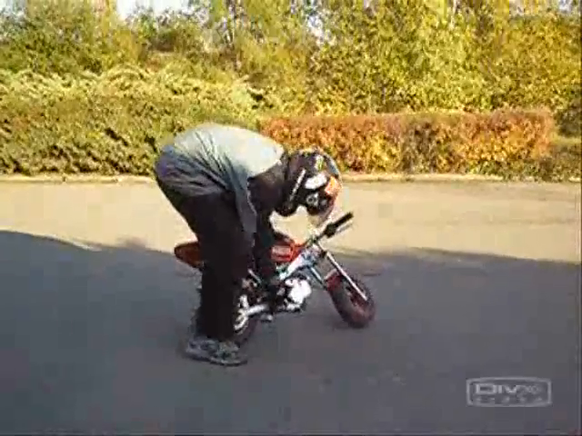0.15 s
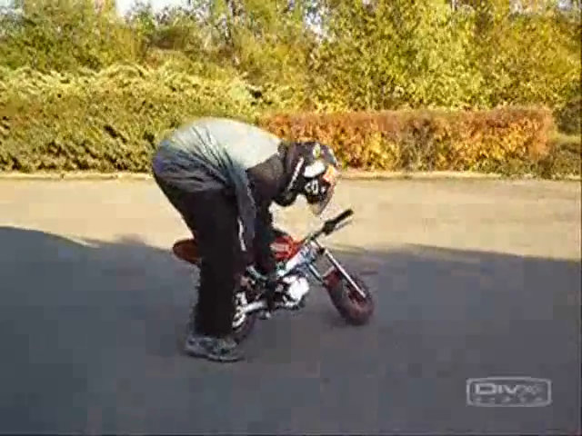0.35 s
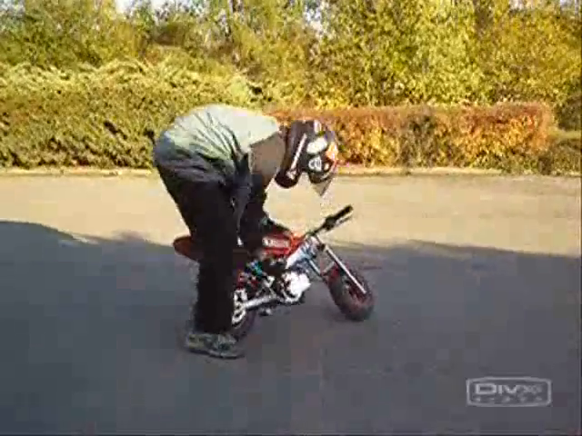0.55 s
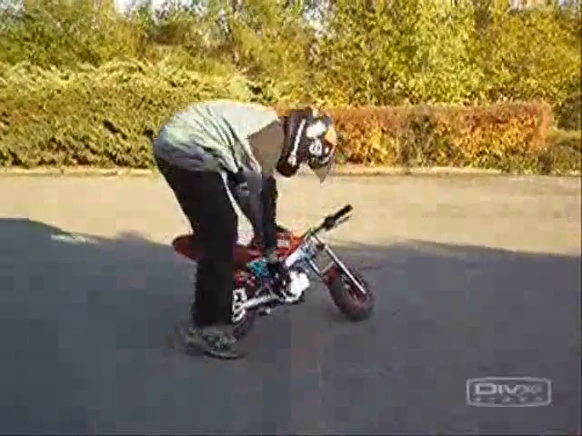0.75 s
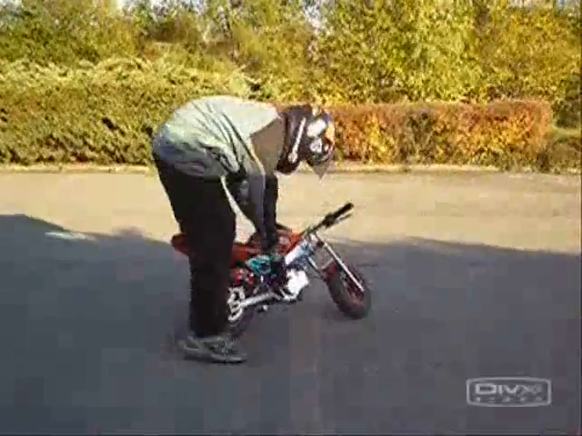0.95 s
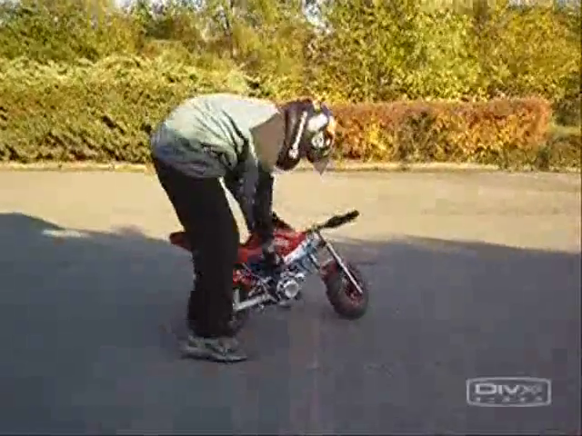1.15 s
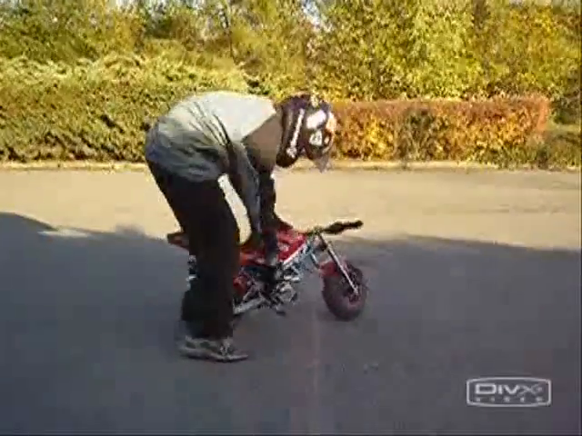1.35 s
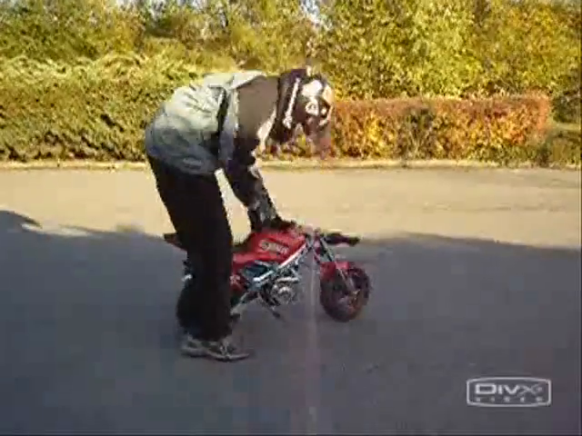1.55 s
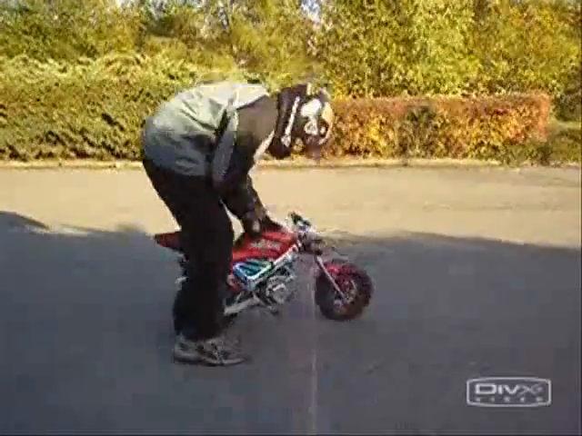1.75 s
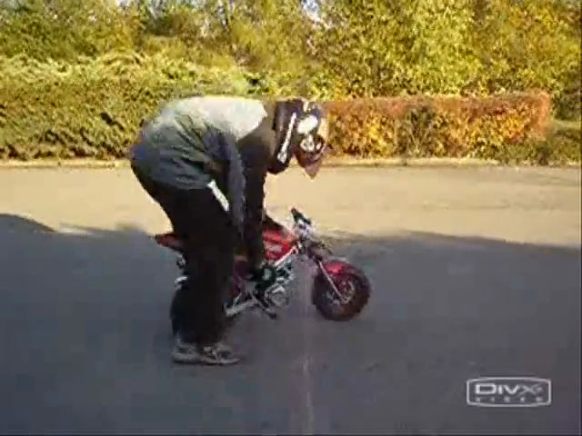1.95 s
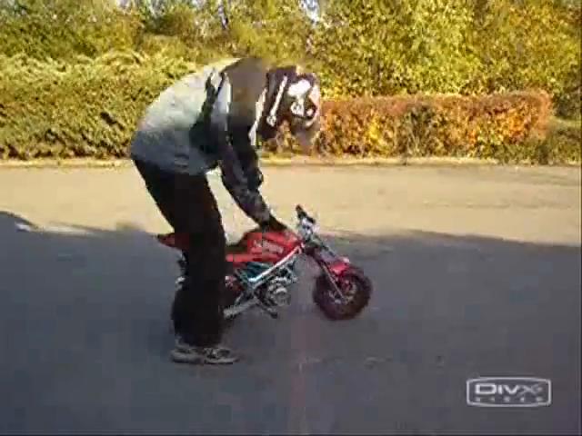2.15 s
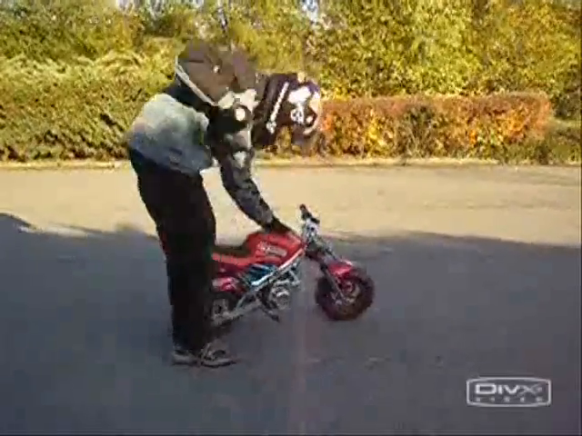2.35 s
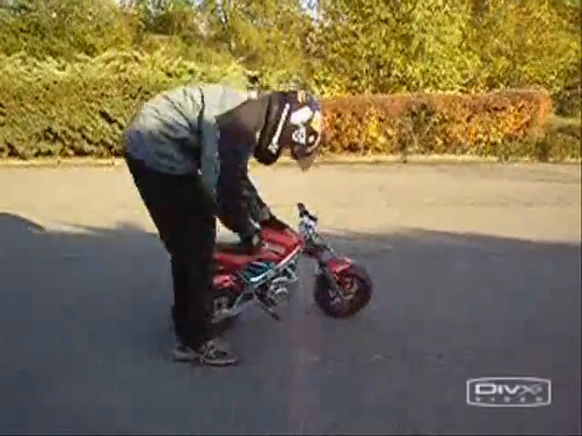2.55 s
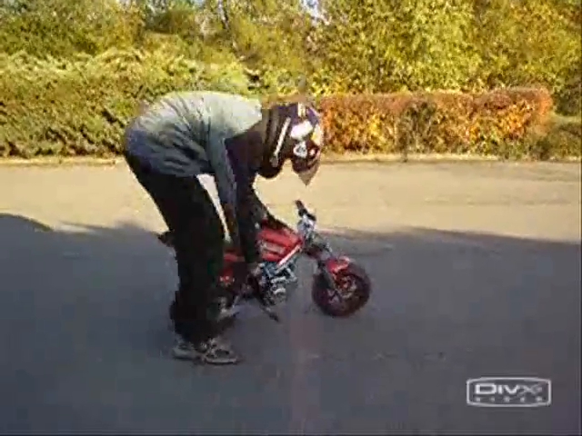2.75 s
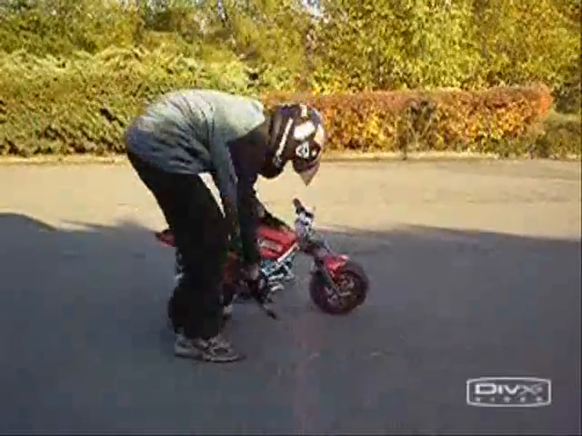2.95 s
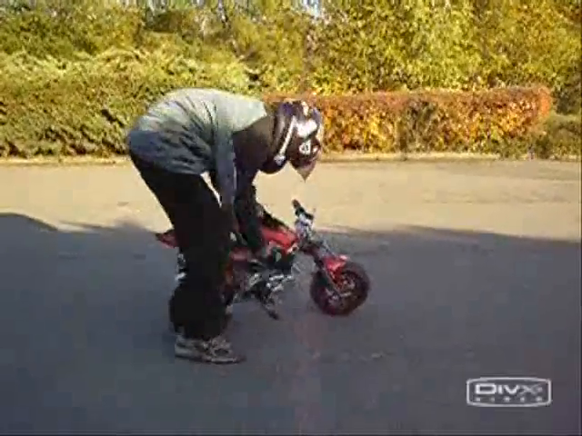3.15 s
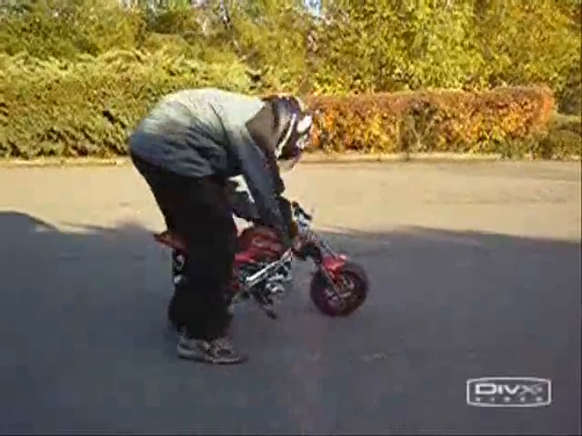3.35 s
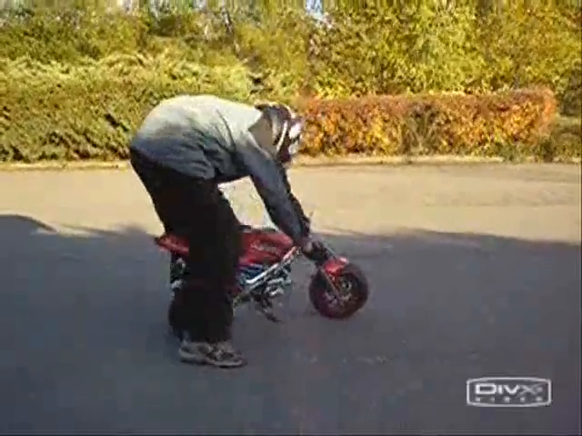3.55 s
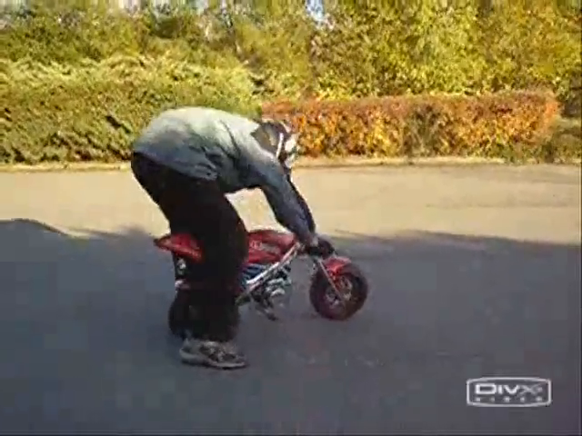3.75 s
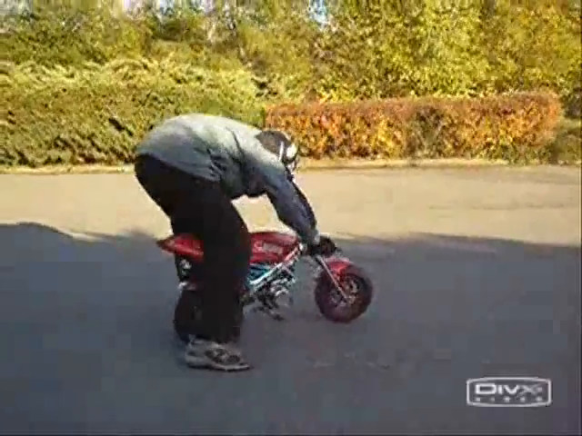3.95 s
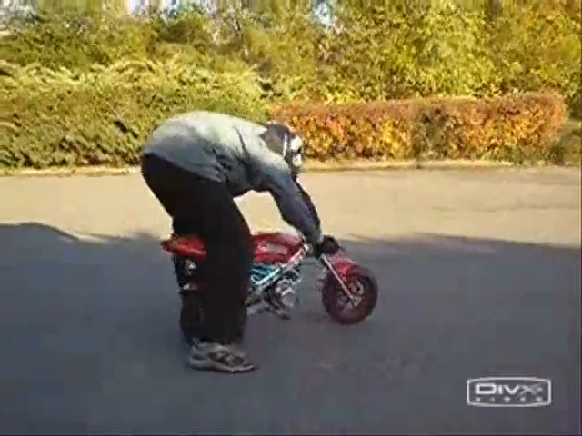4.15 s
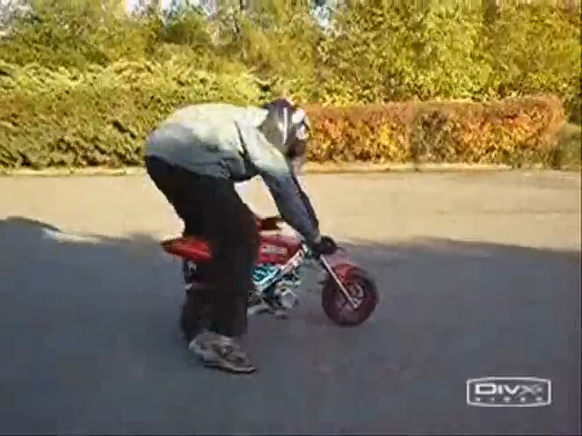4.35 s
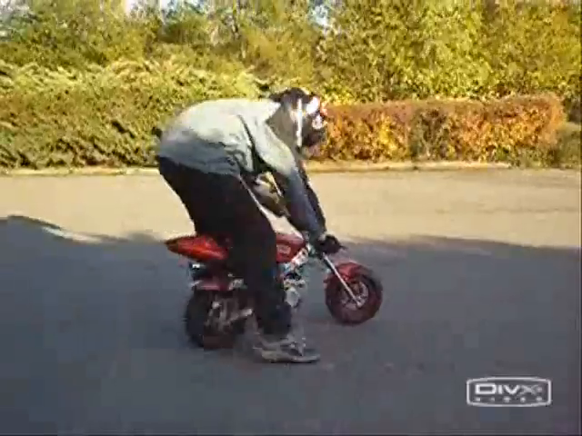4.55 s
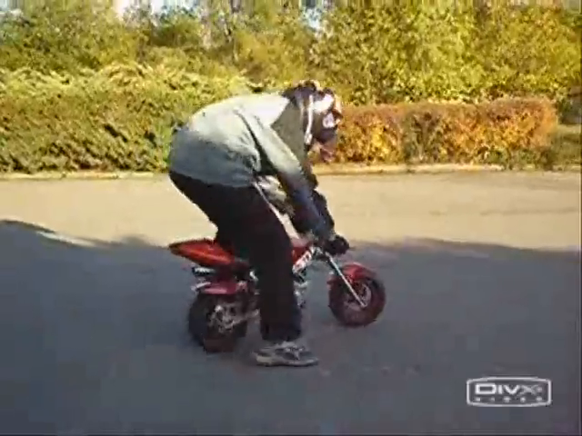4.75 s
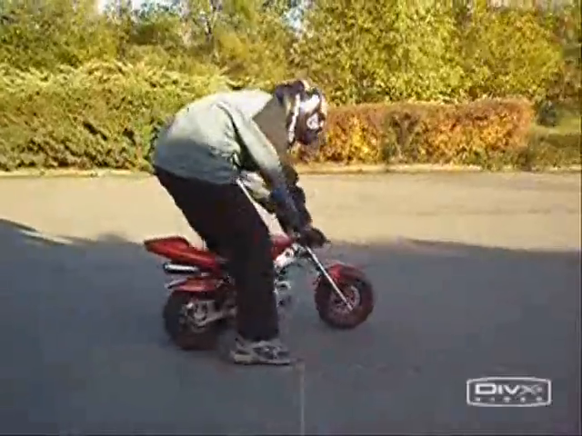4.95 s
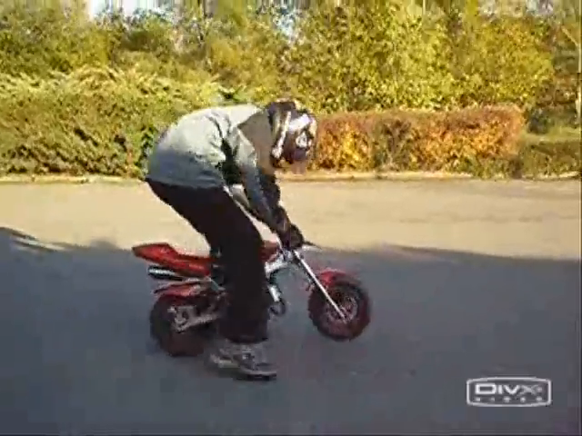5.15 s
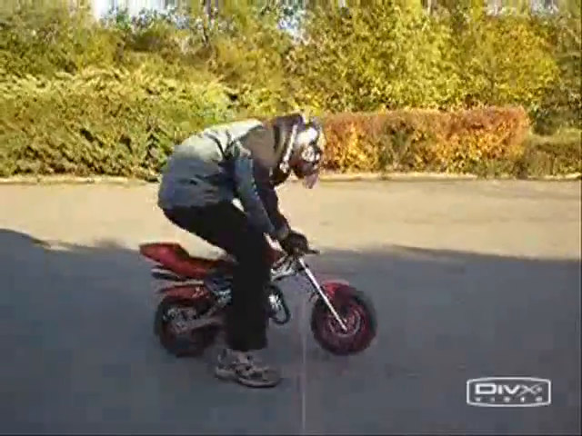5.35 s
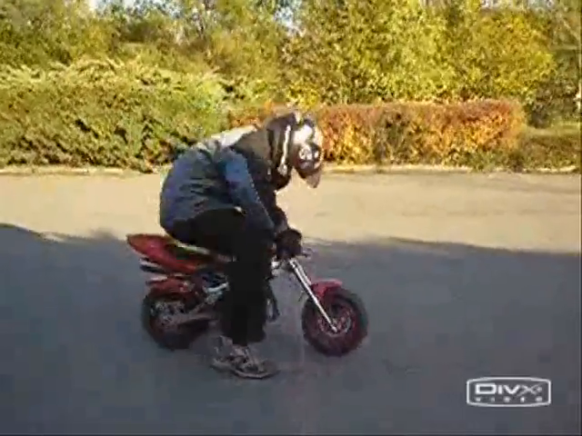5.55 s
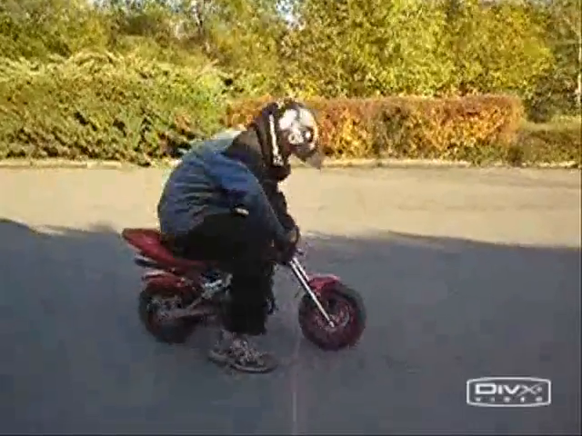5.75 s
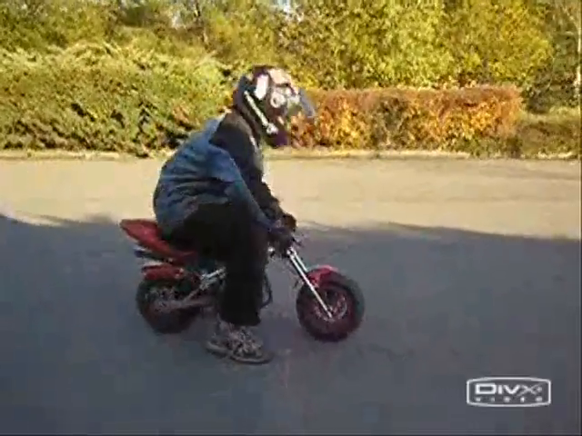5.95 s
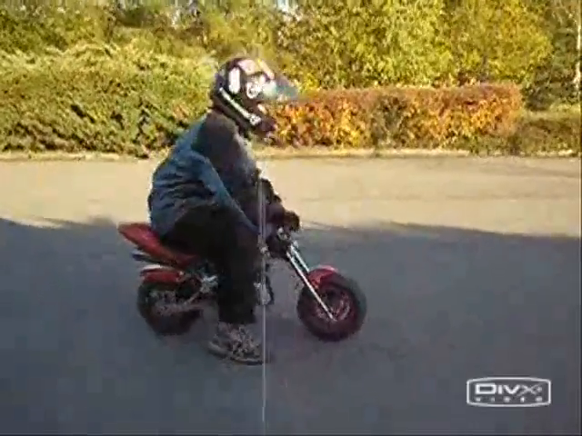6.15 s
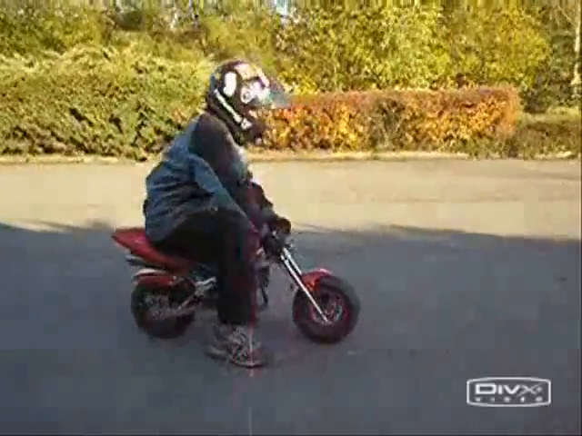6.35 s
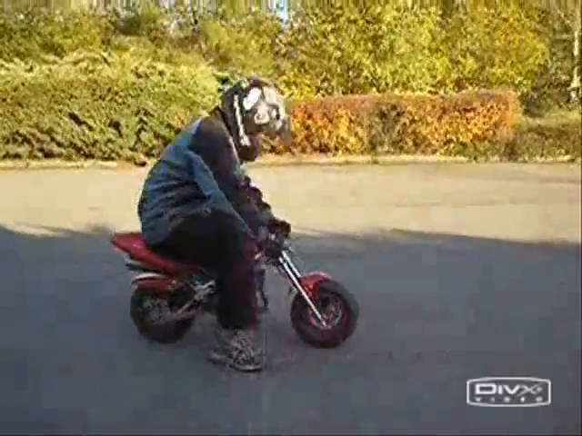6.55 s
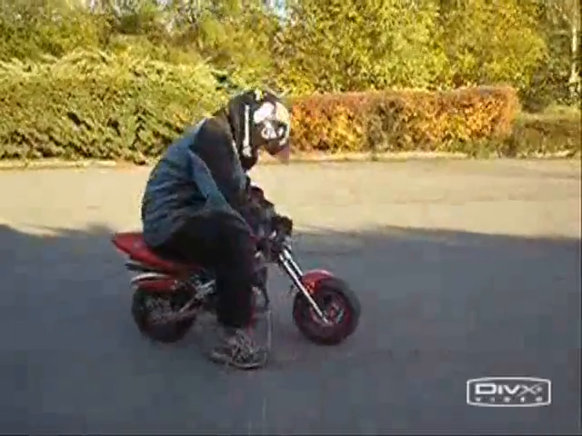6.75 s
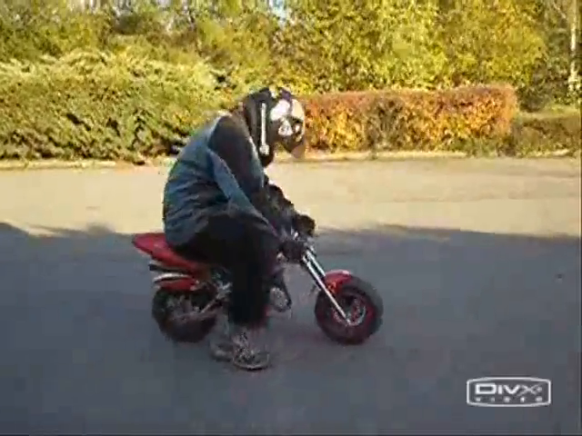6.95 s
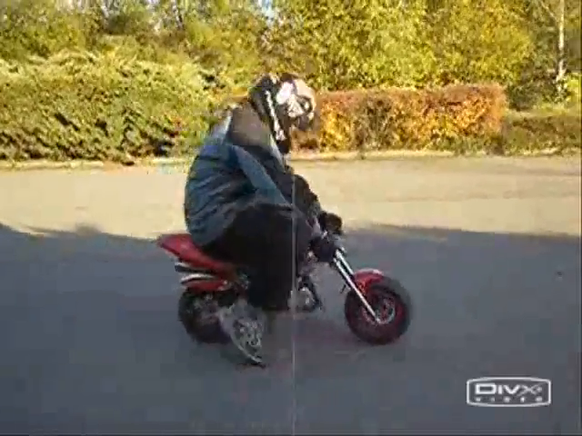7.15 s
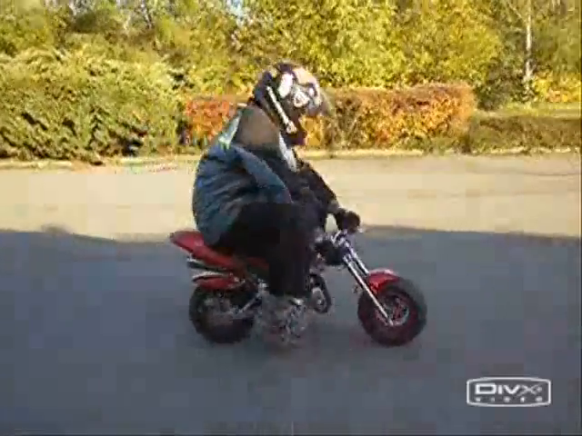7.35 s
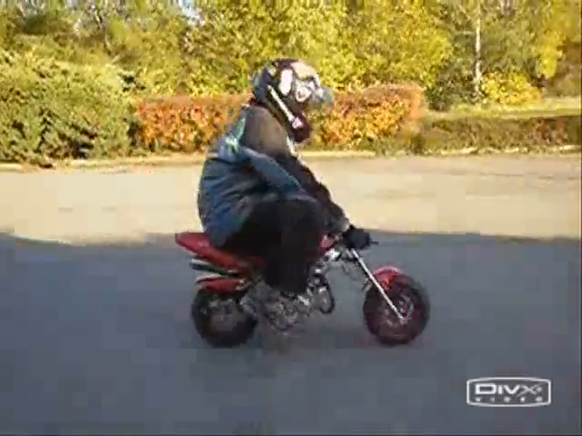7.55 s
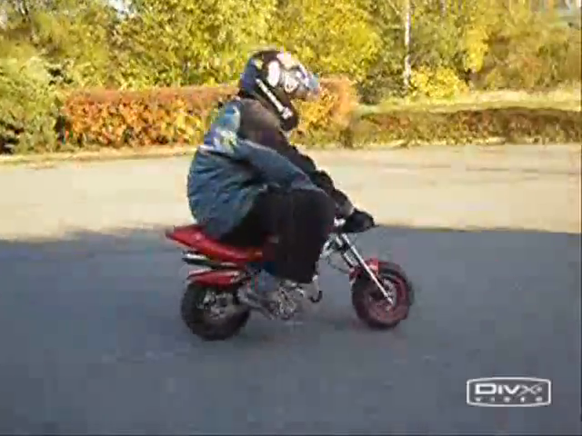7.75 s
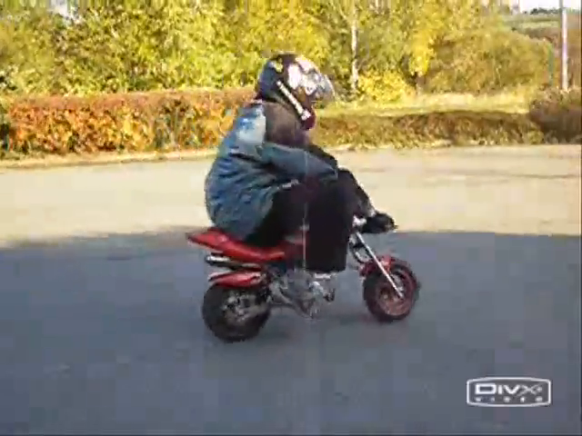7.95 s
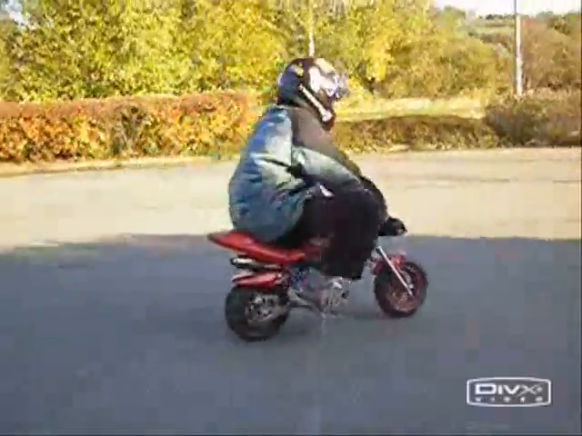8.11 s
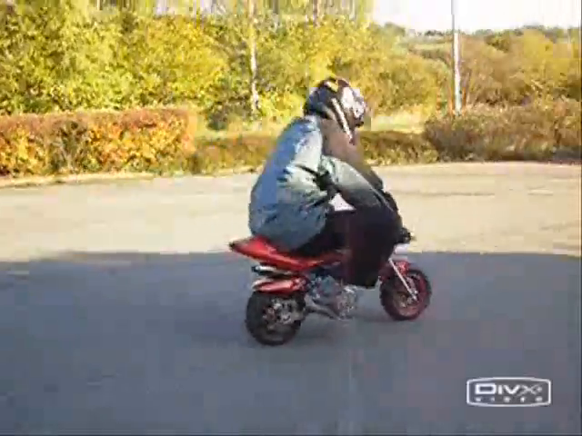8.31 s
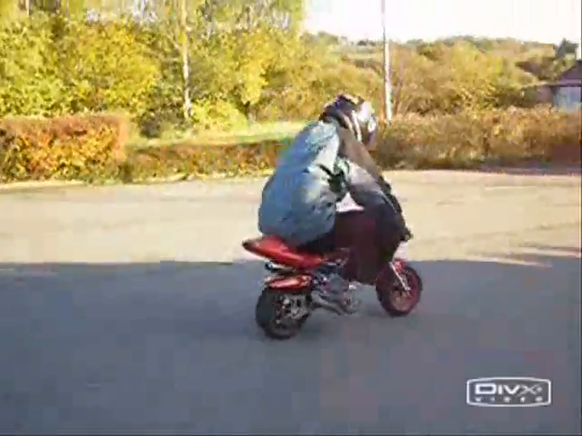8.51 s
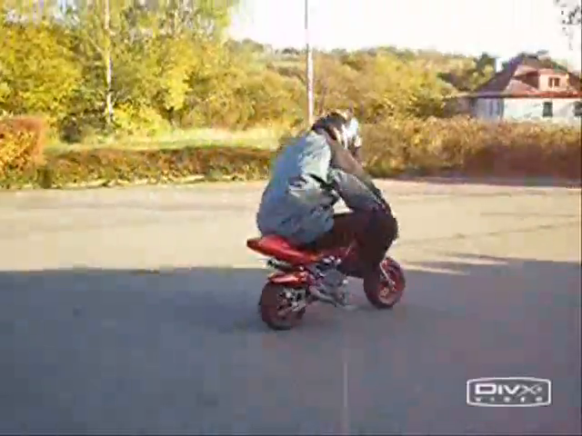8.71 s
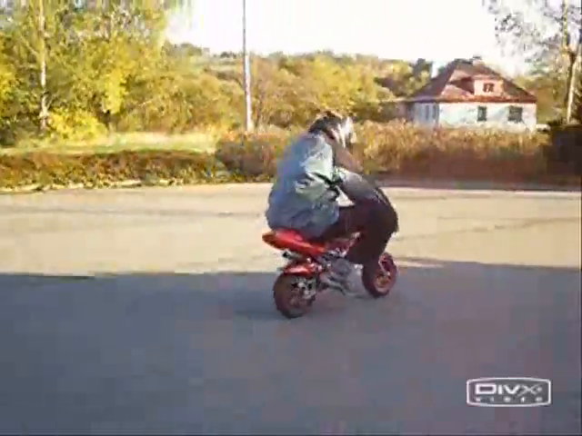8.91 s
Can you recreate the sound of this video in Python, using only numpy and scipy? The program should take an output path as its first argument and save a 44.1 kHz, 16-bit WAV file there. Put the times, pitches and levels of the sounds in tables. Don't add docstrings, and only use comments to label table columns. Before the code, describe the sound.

A mini motorbike is fiddled with and yanked to life outdoors, sputtering with ringing metal before smoothing into a high, even drone moving away.

```python
import sys
import numpy as np
from scipy import signal
from scipy.fft import rfft, irfft, next_fast_len
from scipy.io import wavfile
from scipy.ndimage import uniform_filter1d, map_coordinates

SR = 44100
rng = np.random.default_rng(int(sys.argv[2]) if len(sys.argv) > 2 else 0)


def int16_out(signal):
    q = np.round(np.clip(np.atleast_2d(signal).T, -1, 1) * 32767)
    wavfile.write(sys.argv[1], SR, q.astype(np.int16))


def volts_from_decibels(level):
    exponent = np.asarray(level, float) / 20
    return 10 ** exponent


N = 396018

# pitch_hz, level_db (per Hz)
AIR_SPECTRUM = [(18, -50), (30, -10.5), (128, -6), (165, 3.5), (295, 0.5), (335, -3.5), (365, 2),
                (677, 0.5), (3020, -12.5), (4930, -26.5), (6410, -70.5), (10800, -120)]
# time_s, level_db
AIR_LEVEL = [
    (0.0, -40.5),
    (0.628, -39.5),
    (1.6, -36.5),
]
# delay_s, level_db
ECHOES = [
    (.009, -16),
    (.021, -20),
]
# start_s, peak_db, low_ring_hz, high_ring_hz, high_share_db
CONTACTS = [(0.71, -31.5, 990, 2130, -0.5), (0.806, -10.5, 880, 2200, -13.5), (0.95, -17, 550, 2410, -13.5),
            (1.013, -13, 790, 2560, -14.5), (1.128, -14, 472, 1730, -21.5), (1.163, -6, 520, 1760, -20),
            (1.205, -20, 470, 2080, -1.5), (1.268, -15, 593, 2290, -6.5), (1.297, -19, 824, 2200, 0),
            (1.347, -11, 507, 2230, -12), (1.403, -25, 547, 2680, -4), (1.493, -23.5, 530, 2680, -3),
            (1.518, -11.5, 875, 2270, -6), (1.653, 3, 810, 2170, -6.5), (1.71, -8, 860, 2590, -5.5),
            (1.759, -2.5, 630, 1780, -19.5), (1.824, -1, 635, 2080, -21.5), (1.929, 2.5, 657, 2500, -17.5),
            (2.049, -9.5, 676, 1730, 4.5), (2.257, -28.5, 487, 2460, 4.5), (2.295, 3, 713, 1800, -6),
            (2.433, -14, 530, 2420, -3.5), (2.468, -3, 840, 2510, -4), (2.492, -5, 747, 2234, -3)]
# pitch_hz, level_db, t60_s
PAWL = [(3430, -8, .09), (4520, -10, .08)]
# start_s, peak_db, pitch_hz
COUGHS = [
    (1.723, -6, 176),
    (2.339, -1.5, 198),
    (2.355, -2, 195),
    (2.385, -2.5, 234),
    (2.444, -0.5, 191.3),
]
# start_s, length_s, pitch_hz, level_db
SPRING = (2.175, .065, 576, -27)
# time_s, effort_db
PULLS = [
    [(1.625, -35.5), (1.665, -26), (1.7, -33), (1.84, -28), (1.87, -18), (1.915, -24.5), (1.935, -12.5), (2.064, -21), (2.15, -39.5)],
    [(2.3, -23), (2.43, -24), (2.474, -18), (2.5, -18.5), (2.55, -19), (2.58, -31)],
]
# pitch_hz, level_db (per Hz)
DRUM_SPECTRUM = [(120, -40.5), (200, -5.5), (361, -10), (477, -1), (555, -2.5), (646, -5.5), (1320, -9),
                 (1500, -56.5), (1950, -45), (3300, -120)]
# pitch_hz, level_db (per Hz)
RATCHET_SPECTRUM = [(880, -24), (1500, -8), (1670, -5), (1890, -5.5), (2310, 0.5), (2670, -0.5),
                    (3500, -10), (4930, -24), (6410, -59), (10800, -120)]
# pitch_hz, level_db, shift_at_bite_hz
GEAR_WHINES = [(3610, -38, -40), (4160, -43.5, 109)]
# start_s, level_db
SWELLS = [(2.557, -17), (2.712, -15.5), (2.841, -11.5), (2.978, -12), (3.153, -13), (3.309, -11.5),
          (3.544, -11.5), (3.661, -9), (3.788, -16), (3.895, -9), (4.099, -12), (4.168, -9), (4.259, -11.5),
          (4.33, -9), (4.417, -11.5), (4.563, -9), (4.649, -10.5), (4.733, -10), (4.859, -11.5),
          (5.046, -10.5), (5.147, -14), (5.295, -18), (5.547, -18), (5.719, -12.5), (5.92, -16.5),
          (6.096, -12), (6.253, -18), (6.407, -14), (6.613, -14.5), (6.765, -16.5)]
# time_s, pitch_hz, second_mode_db
BELL_TUNING = [(2.55, 1220, -47.5), (2.92, 1218, -22), (4.13, 1212, -18), (4.56, 1228, -23.5),
               (4.75, 1244, -9.5), (4.95, 1217, -16), (5.33, 1220, -34), (5.7, 1216, -39.5),
               (6.15, 1250, -16), (6.82, 1241, -20)]
# time_s, turns_hz, effort_db
CRANK = [(2.5, 49, -25), (2.61, 54.12, -16.5), (2.97, 61.35, -9), (3.09, 71.5, -11), (3.58, 73.2, -12),
         (3.69, 79.7, -11.5), (4.05, 78.7, -15.5), (4.34, 81.2, -13), (4.77, 82.66, -12), (5.1, 78.08, -13),
         (5.66, 77.06, -12), (6.2, 84.34, -11), (6.67, 82.6, -10.5), (6.81, 91.3, -9), (6.87, 95.5, -17),
         (7.06, 98.74, -13.5), (7.8, 99, -14), (8.98, 99.4, -17)]
# time_s, clutch_grip (0-1), firing_unevenness (0 even, 1 rough)
LOAD = [
    (2.5, 0, 1.5),
    (2.95, 0, 1.4),
    (3.35, 0, .9),
    (4.3, 0, .6),
    (5, 0, .8),
    (6.3, 0, .65),
    (6.76, 0, .35),
    (6.86, 1, .1),
    (8.98, 1, .13),
]
# time_s, level_change_db (below 0 weaker, above 0 stronger)
MISFIRES = [(2.62, -4), (2.706, -0.5), (2.845, -4), (2.904, -7.5), (3.19, -10.5), (3.4, -6), (3.482, -4),
            (3.527, -14.5), (3.577, -8.5), (3.774, -7), (3.877, -1), (3.982, -11), (4.185, -5.5),
            (4.389, -9), (4.437, -13.5), (4.572, -1), (4.84, 4.5), (5.036, -9.5), (5.125, -19),
            (5.337, -19), (5.467, -9), (5.526, -5.5), (5.639, -17), (5.743, -14.5), (5.886, -6),
            (6.012, -10.5), (6.125, -9), (6.292, -15), (6.343, -12), (6.632, -6)]
# pitch_hz, width_hz, level_db
CHAMBER = [(179, 150, 13.5), (204.5, 35, 24.5)]
# pitch_hz, level_db (per Hz)
IDLE_PIPE = [(180, -32.5), (300, -8), (361, -7), (484, 1.5), (532, -7), (573, 1), (697, -4), (785, 2.5),
             (966, -9.5), (1150, -0.5), (1500, -18), (2530, -120)]
# pitch_hz, level_db (per Hz)
SIDE_PIPE = [(160, -40.5), (280, -10.5), (391, -5), (490, 9), (673, 5), (798, 8.5), (970, -2.5),
             (1080, 3.5), (1200, 8.5), (1320, 1.5), (1410, -9.5), (1950, -19.5), (2540, -52), (4290, -120)]
# pitch_hz, level_db (per Hz)
REAR_PIPE = [(160, -43.5), (280, -0.5), (394, -5.5), (486, 8), (668, 1), (779, 3.5), (902, 8), (1000, -6.5),
             (1200, 7.5), (1430, -12.5), (1630, -17.5), (1950, -21), (2540, -55), (4290, -120)]
# time_s, rear_share (0-1)
HEADING_AWAY = [
    (7.7, 0),
    (8.2, 0.95),
]
# pitch_hz, level_db (per Hz)
CASING = [(820, -23.5), (1400, -2), (1480, -17), (1630, -2), (1980, -8), (2120, 0), (2300, -1), (2490, 0),
          (2630, -2.5), (2940, -1), (3430, -12.5), (3690, -12), (3930, -17.5), (4340, -19), (4930, -24.5),
          (6410, -72.5), (10800, -120)]
# start_s, peak_db
OVERLOADS = [(2.2941, -32), (2.46, -66), (2.469, -43), (4.7127, -39), (5.432, -41.5), (6.6665, -44),
             (6.703, -41.5), (6.811, -55.5), (2.858, -59)]

FIRES_S = 2.5
MIC_TOP_HZ, MIC_OFFSET = 5145, .0285
IDLE_TURNS_HZ = 80
THUMP_DB, BARK_DB, RASP_DB = -7, -5, -5.5
THUMP_PER_TURN_DB, BARK_PER_TURN_DB, RASP_PER_TURN_DB = -.18, .15, .02
STUMBLE_S = .052
STUMBLE_DB, STUMBLE_SCATTER_DB = -4.5, 2.5
SWELL_S, REST_S = .046, .12
FOLLOW_DB, FOLLOW_SCATTER_DB = -4, 3.5
RING_CYCLES = 29
HARD_PULL_DB, RATCHET_GROWS, RATCHET_DB = -19.5, 1.07, -1
HARD_DB, LEAD_S, LEAD_DB = 3, .0033, -11
BITE_S, BITE_DB, SETTLE_S = 6.9, 10, .4


def unit(x):
    return x / np.sqrt(np.mean(x ** 2) + 1e-20)


def curves(rows, **ends):
    s, *cols = np.transpose(rows)
    return [np.interp(np.arange(N) / SR, s, c, **ends) for c in cols]


def noise():
    return rng.standard_normal(N)


def tone(hz):
    return np.sin(2 * np.pi * np.cumsum(hz) / SR)


def wobble(rate):
    return map_coordinates(rng.standard_normal(int(N * rate / SR) + 4), [np.arange(N) * rate / SR])


def bumps(rows, rise, fall):
    x, t = np.zeros(N), np.arange(-SR // 8, SR // 8 + 1) / SR
    for s, value in rows:
        x[round(s * SR)] = value
    return signal.fftconvolve(x, np.exp(-(t / np.where(t < 0, rise, fall)) ** 2), "same")


def between(rows, pace, rest):
    s = [row[0] for row in rows]
    gaps = [(a, b) for a, b in zip(s, s[1:]) if b - a > rest]
    return np.concatenate([np.linspace(a, b, round((b - a) / pace) + 1)[1:-1] for a, b in gaps])


def filtered(x, response):
    m = next_fast_len(N + SR // 2)
    return irfft(rfft(x, m) * response(np.fft.rfftfreq(m, 1 / SR)), m)[..., :N]


def coloured(x, points):
    f, db = np.transpose(points)
    gain = volts_from_decibels(np.interp(np.log(np.fft.rfftfreq(2 ** 14, 1 / SR) + 1), np.log(f), db))
    cepstrum = irfft(np.log(gain + 1e-5))
    cepstrum[1:len(cepstrum) // 2] *= 2
    cepstrum[len(cepstrum) // 2 + 1:] = 0
    return signal.fftconvolve(x, irfft(np.exp(rfft(cepstrum)))[:SR // 8])[:N]


def even(x):
    return x / np.sqrt(np.abs(uniform_filter1d(x ** 2, SR // 4)) + 1e-12)


def ring(x, hz, sharpness):
    return unit(signal.lfilter(*signal.iirpeak(hz, sharpness, SR), x))


def patchy(x, depth_db):
    z = signal.stft(x, nperseg=2048)[2]
    field = uniform_filter1d(rng.standard_normal(z.shape), size=4, axis=0)
    field = uniform_filter1d(field, size=9, axis=1)
    return signal.istft(z * volts_from_decibels(depth_db * unit(field)), nperseg=2048)[1][:N]


def air():
    level_db, = curves(AIR_LEVEL)
    return volts_from_decibels(level_db + .54 * wobble(1)) * unit(coloured(noise(), AIR_SPECTRUM))


def contacts():
    out, t = np.zeros(N), np.arange(SR // 8) / SR
    for s, db, low_hz, high_hz, high_db in CONTACTS:
        t60 = RING_CYCLES / low_hz
        touch = rng.standard_normal((3, len(t))) * (1 + 1.2 * np.exp(-t / .002))
        low = ring(touch[0], low_hz, 11) * volts_from_decibels(-50 * t / t60)
        shell = ring(ring(touch[2], 2500, 2.2), 2500, 2.2)
        high = (ring(touch[1], high_hz, 6.4) + .7 * shell) * volts_from_decibels(high_db + 5 - 65 * t / t60)
        hit = out[round(s * SR):][:len(t)]
        hit += volts_from_decibels(db - 8) * (.71 * low + high) * (1 - np.exp(-t / .001))
        if db > HARD_DB:
            for hz, level, life in PAWL:
                hit += volts_from_decibels(db - 10 + level - 60 * t / life) * np.sin(2 * np.pi * hz * t)
            out[round((s - LEAD_S) * SR):][:len(t)] += volts_from_decibels(db - 12 + LEAD_DB) * high
    return out


def coughs():
    out, t = np.zeros(N), np.arange(SR // 8) / SR
    for s, db, hz in COUGHS:
        envelope = volts_from_decibels(db + 3.5 - 60 * t / .065) * (1 - np.exp(-t / .0017))
        out[round(s * SR):][:len(t)] += envelope * np.sin(2 * np.pi * hz * t)
    return out


def recoil_spring():
    out, t = np.zeros(N), np.arange(SR // 8) / SR
    s, life, hz, db = SPRING
    envelope = volts_from_decibels(db) * np.sin(np.pi * np.clip(t / life, 0, 1))
    out[round(s * SR):][:len(t)] += envelope * np.sin(2 * np.pi * hz * t)
    return out


def cord_scrape():
    drum_db = np.max([curves(pull, left=-120, right=-120)[0] for pull in PULLS], axis=0)
    ratchet_db = HARD_PULL_DB + RATCHET_DB + RATCHET_GROWS * (drum_db - HARD_PULL_DB)
    teeth = volts_from_decibels(3.5 * wobble(250) + 2.5 * wobble(60))
    drum = unit(teeth * coloured(noise(), DRUM_SPECTRUM))
    ratchet = unit(teeth * coloured(noise(), RATCHET_SPECTRUM))
    return volts_from_decibels(drum_db) * drum + volts_from_decibels(ratchet_db) * ratchet


def gears():
    grip, _ = curves(LOAD)
    bite = np.exp(-np.abs(np.arange(N) / SR - BITE_S) / SETTLE_S)
    whines = np.zeros(N)
    for hz, db, off_hz in GEAR_WHINES:
        level = volts_from_decibels(db + 1.5 * wobble(4) + 2.4 * wobble(30))
        glide = 1 + .005 * wobble(3.5) + .004 * wobble(60)
        whines += level * tone((hz + off_hz * bite) * glide)
    return np.sqrt(grip) * volts_from_decibels(BITE_DB * bite) * whines


def clutch_bell():
    hz, second_db = curves(BELL_TUNING)
    s = between(SWELLS, SWELL_S, REST_S)
    follow_db = np.interp(s, *np.transpose(SWELLS)) + FOLLOW_DB
    follow_db += FOLLOW_SCATTER_DB * rng.standard_normal(len(s))
    swells = SWELLS + list(zip(s, follow_db))
    power = bumps([(s + .012, volts_from_decibels(2 * db)) for s, db in swells], rise=.03, fall=.011)
    swell = np.sqrt(np.abs(power))
    swell += .1 * uniform_filter1d(swell, SR // 6)
    glide = 1 + .004 * wobble(22) + .002 * wobble(120)
    first = 1.02 * swell * volts_from_decibels(.8 * wobble(90)) * tone(hz * glide)
    whine = tone(1.985 * hz * (1 + .0044 * wobble(60)))
    ringing = uniform_filter1d(swell, SR // 20) > 1e-3
    return first + volts_from_decibels(second_db - 6 + 5.1 * wobble(40)) * ringing * even(swell + .068) * whine


def crank_turns(speed, rough):
    s = between(MISFIRES, STUMBLE_S, STUMBLE_S)
    stumbles = list(zip(s, STUMBLE_DB + STUMBLE_SCATTER_DB * rng.standard_normal(len(s))))
    weak_db = bumps(MISFIRES + stumbles, rise=.0062, fall=.0097)
    lag_db = weak_db - uniform_filter1d(weak_db, SR // 5)
    turns = np.cumsum(speed * (1 + .004 * lag_db + .012 * rough * wobble(14))) / SR
    return turns, weak_db


def firings(turns, scatter, size_db):
    at = np.flatnonzero(np.diff(np.floor(turns)))
    chance = rng.standard_normal((1000, 2))[:len(at)]
    exact = at + (scatter[at] * chance[:, 0] - turns[at + 1] % 1) / (turns[at + 1] - turns[at])
    taps = np.floor(exact)[:, None] + np.arange(-7, 9)
    weight = np.sinc(taps - exact[:, None]) * volts_from_decibels(size_db[at] * chance[:, 1])[:, None]
    return np.bincount(np.clip(taps, 0, N - 1).astype(int).ravel(), weight.ravel(), N)


def chamber_response(f):
    modes = sum(volts_from_decibels(db) * 1j * f * w / (c * c - f * f + 1j * f * w) for c, w, db in CHAMBER)
    return modes * (1j * f / (1j * f + 120)) ** 2 / np.sqrt(1 + (f / 280) ** 7)


def exhaust_thump(turns, rough, weak_db):
    kicks = unit(firings(turns, .02 * rough, 2.2 * rough)) + .42 * rough ** 2 * noise()
    return even(filtered(kicks, chamber_response)) * volts_from_decibels(1.3 * weak_db)


def pipe_bark(turns, pulses, grip, rough, weak_db):
    puff = np.exp(-(turns % 1) / .5)
    blast = pulses + (.18 + .72 * rough) * unit(puff * noise())
    sweep = lambda f: np.exp(-1j * np.pi * f * f * 7e-6)
    idle = even(filtered(coloured(blast, IDLE_PIPE), sweep)) * volts_from_decibels(.17 * weak_db)
    away, = curves(HEADING_AWAY)
    loaded = (1 - away) * even(coloured(blast, SIDE_PIPE)) + away * even(coloured(blast, REAR_PIPE))
    late = lambda f: np.exp(-2j * np.pi * f * (.002 * (f > 1000) + 3e-6 * f))
    return (1 - grip) * idle + grip * patchy(filtered(loaded, late), 2.6)


def casing_rasp(turns, pulses, grip, rough, weak_db):
    slap = 1 + (.2 + .5 * grip) * np.cos(2 * np.pi * (turns - .15))
    rattle = unit(slap * volts_from_decibels(1.2 * wobble(300)) * noise())
    driven = filtered(pulses, lambda f: np.exp(-1j * np.pi * f * f * 3e-6))
    clatter = rattle + .8 * grip * driven
    rasp = even(patchy(coloured(clatter, CASING), 2.3)) * volts_from_decibels(.52 * weak_db + .78 * rough * wobble(29))
    rasp[:round(2.56 * SR)] = 0
    return rasp


def engine():
    speed, effort_db = curves(CRANK)
    effort_db[:round(FIRES_S * SR)] = -120
    faster = speed - IDLE_TURNS_HZ
    thump_db = effort_db + THUMP_DB + THUMP_PER_TURN_DB * faster
    bark_db = effort_db + BARK_DB + BARK_PER_TURN_DB * faster
    rasp_db = effort_db + RASP_DB + RASP_PER_TURN_DB * faster
    grip, rough = curves(LOAD)
    turns, weak_db = crank_turns(speed, rough)
    thump = exhaust_thump(turns, rough, weak_db)
    pulses = unit(firings(turns, .018 * rough + .001, 2.2 * rough + .5))
    bark = pipe_bark(turns, pulses, grip, rough, weak_db)
    rasp = casing_rasp(turns, pulses, grip, rough, weak_db)
    return volts_from_decibels(thump_db + 4) * thump + volts_from_decibels(bark_db + 1.81) * bark + volts_from_decibels(rasp_db) * rasp


def scene():
    starter = contacts() + coughs() + recoil_spring() + cord_scrape()
    bike = starter + gears() + clutch_bell() + engine()
    echoes = lambda f: 1 + sum(volts_from_decibels(db) * np.exp(-2j * np.pi * f * s) for s, db in ECHOES)
    return (air() + volts_from_decibels(-2) * filtered(bike, echoes))[None]


def top_cut(x):
    return signal.sosfilt(signal.butter(12, 15500, fs=SR, output="sos"), x)


def record(dry):
    x = filtered(dry, lambda hz: 1 / np.sqrt(1 + (hz / 3900) ** 8) / np.sqrt(1 + (60 / (hz + 1)) ** 4))
    x = x / (1 + np.abs(x / .9) ** 6) ** (1 / 6)
    x = filtered(x, lambda hz: hz < MIC_TOP_HZ) + MIC_OFFSET
    ticks = np.zeros(N)
    for s, db in OVERLOADS:
        ticks[round(s * SR):][:SR // 150] = volts_from_decibels(db + 7) * rng.standard_normal(SR // 150)

    def splash(hz):
        notch = 1 - np.exp(-((hz - 11000) / 1200) ** 4)
        return (hz > MIC_TOP_HZ) * notch / (1 + (hz / 5000) ** 2)

    mix = x + filtered(ticks, splash)
    return top_cut(mix)


dry = scene()
out = record(dry)
int16_out(out)
```